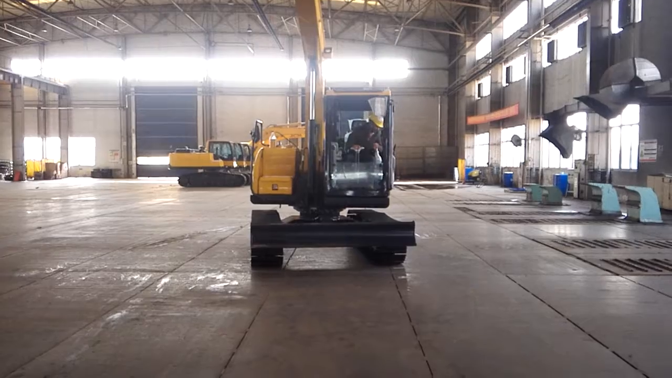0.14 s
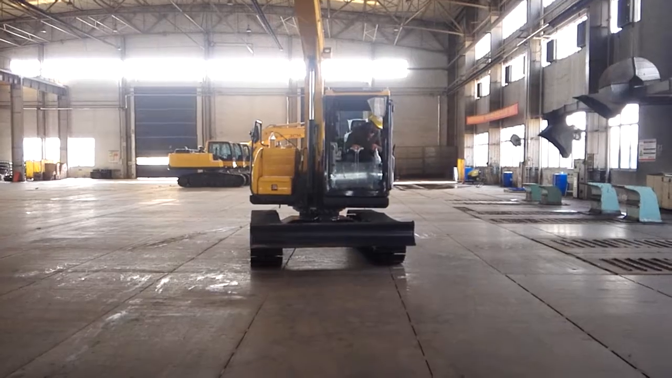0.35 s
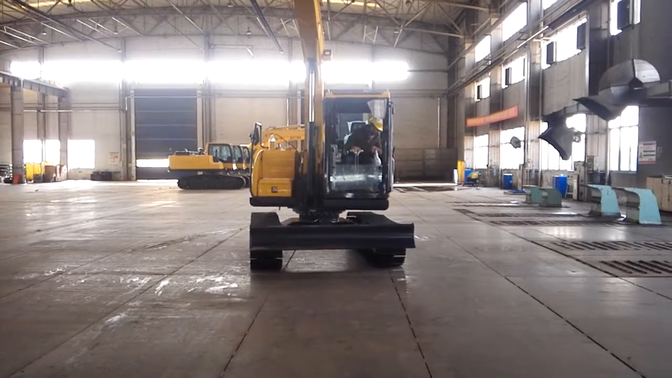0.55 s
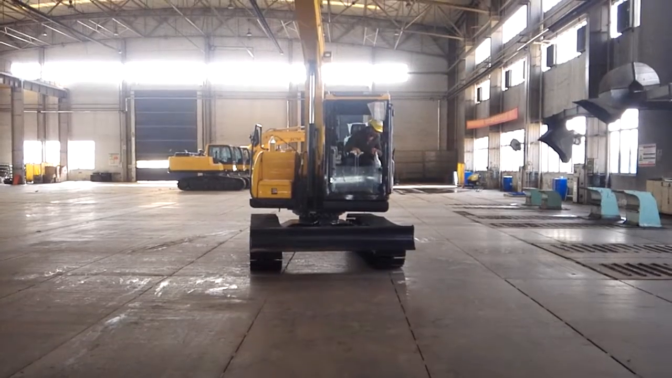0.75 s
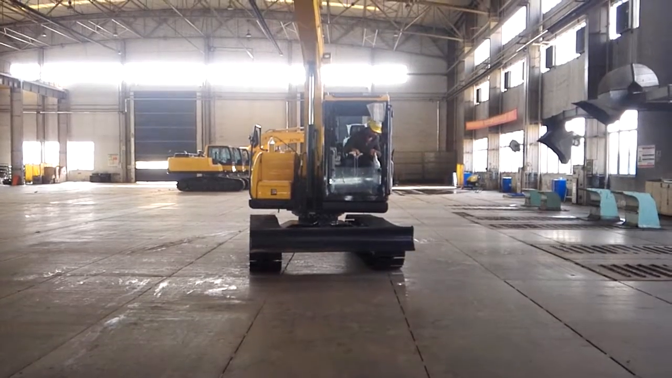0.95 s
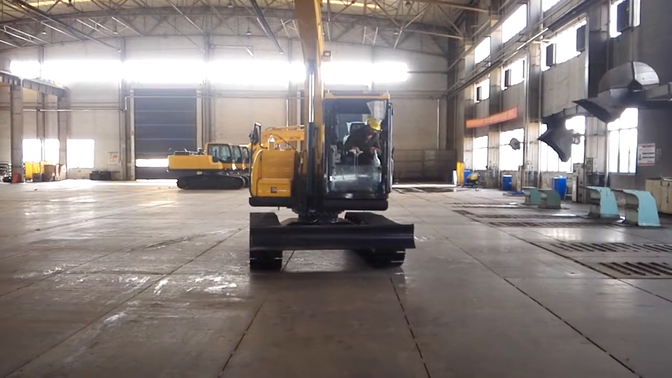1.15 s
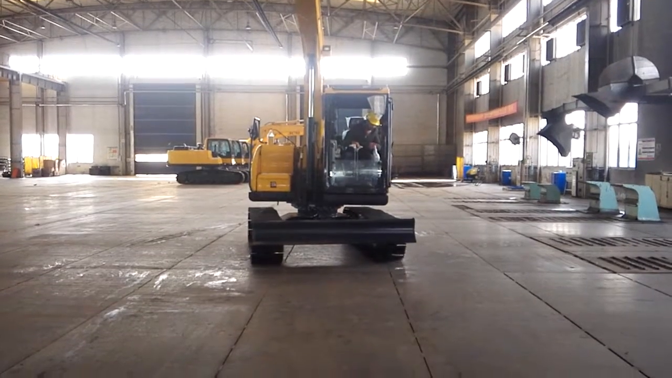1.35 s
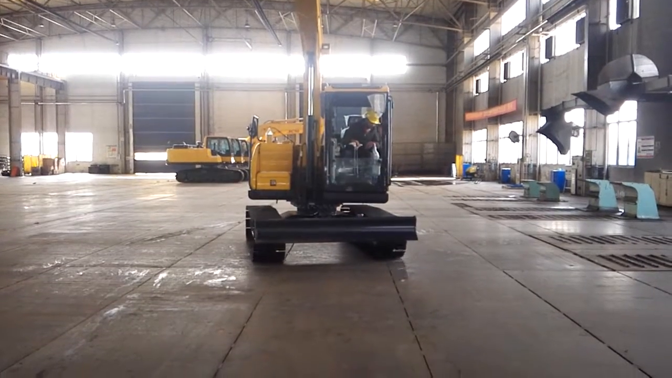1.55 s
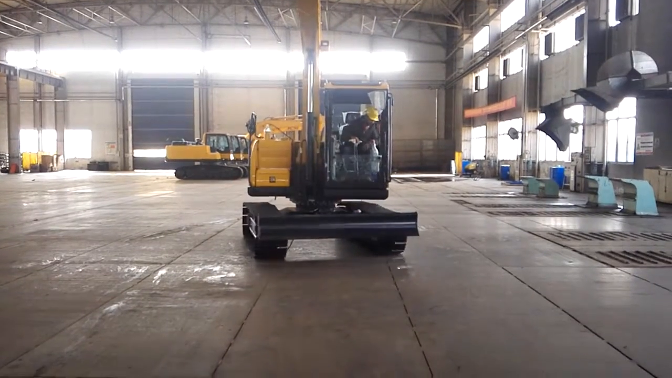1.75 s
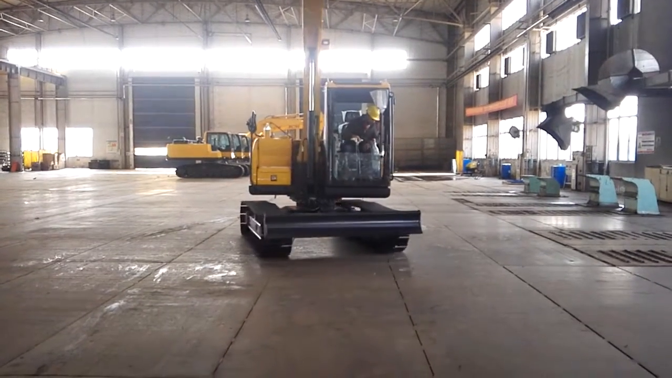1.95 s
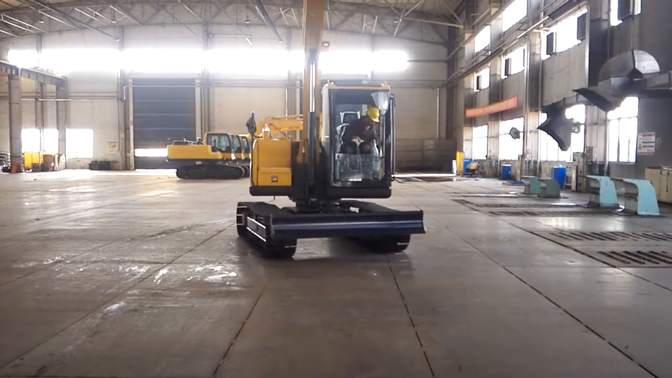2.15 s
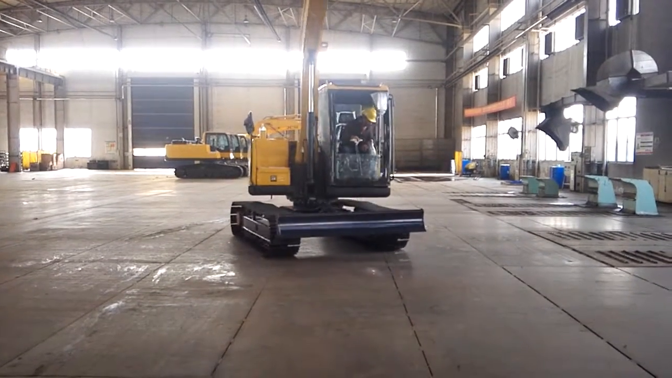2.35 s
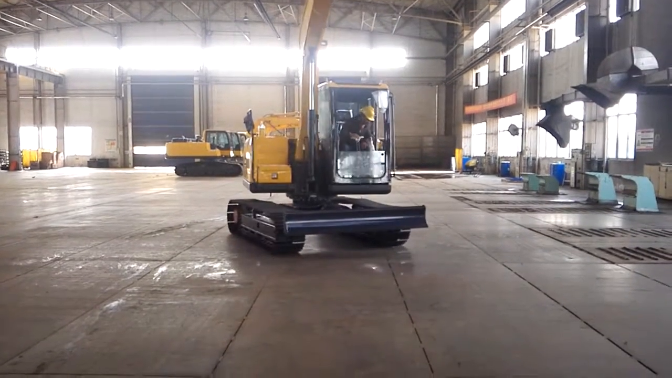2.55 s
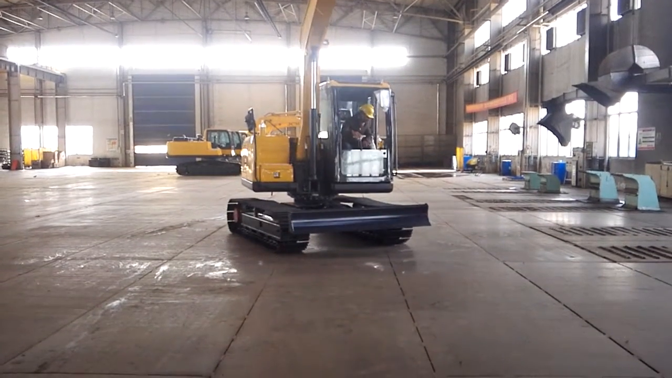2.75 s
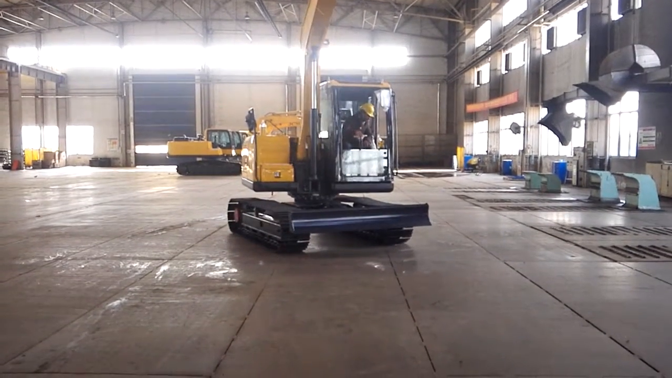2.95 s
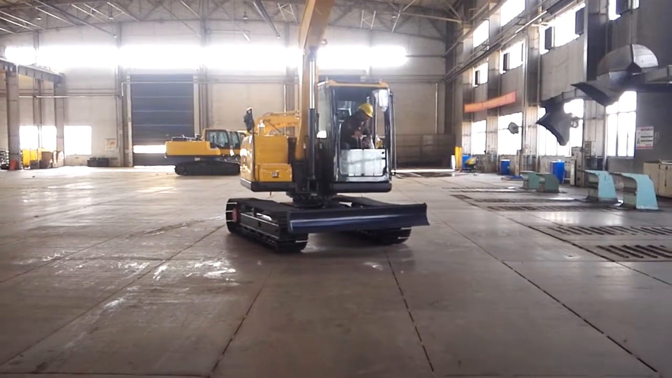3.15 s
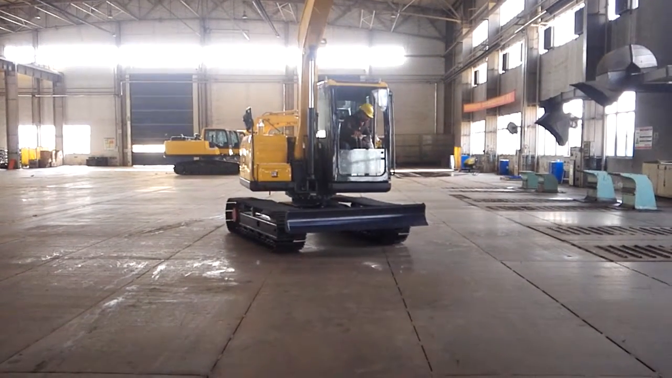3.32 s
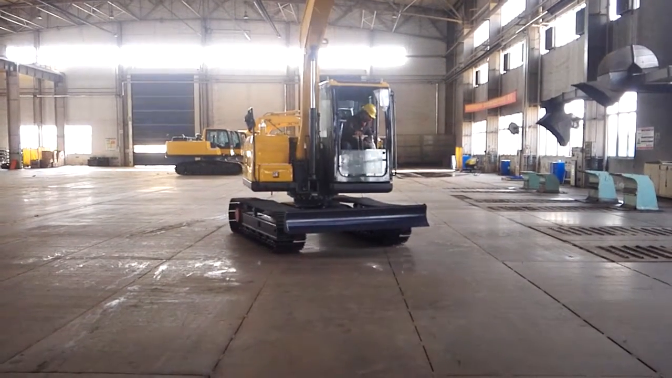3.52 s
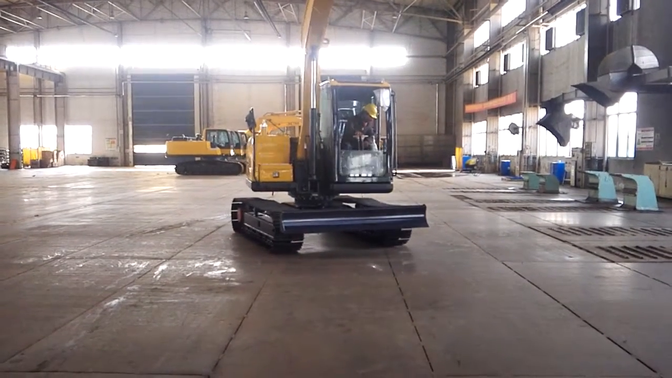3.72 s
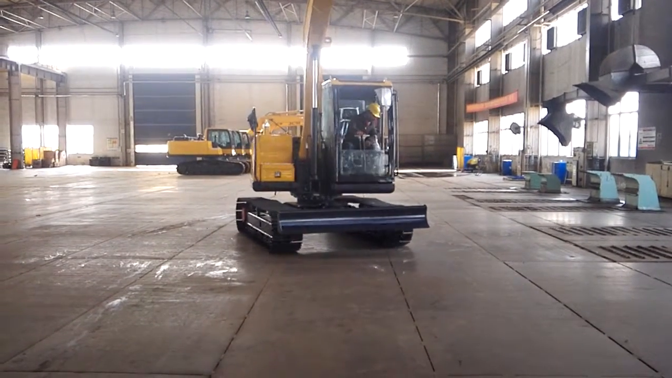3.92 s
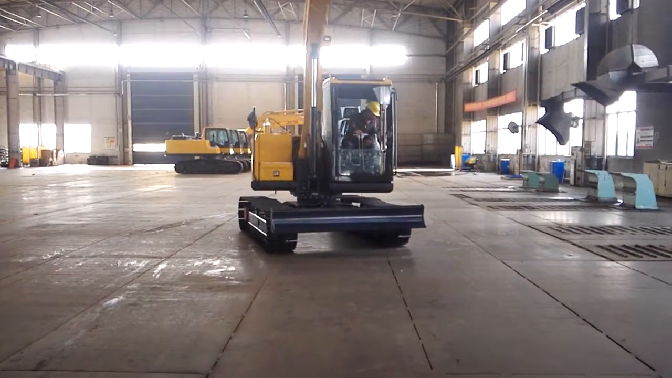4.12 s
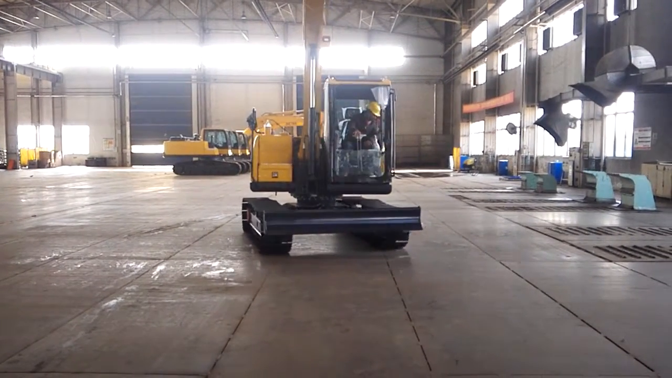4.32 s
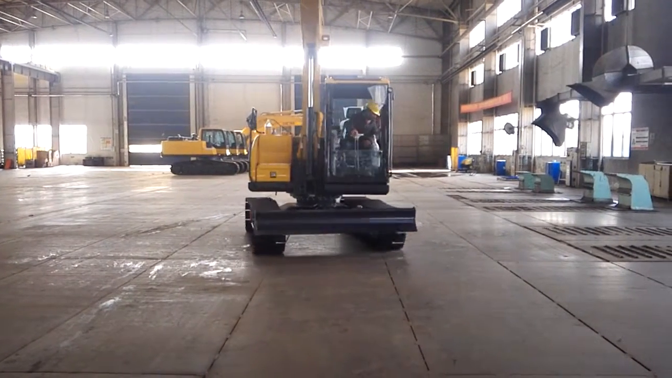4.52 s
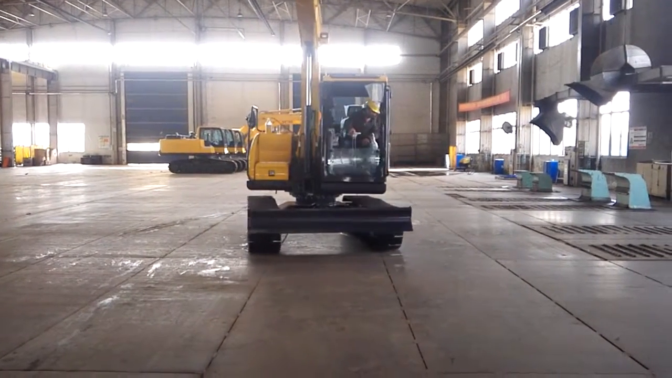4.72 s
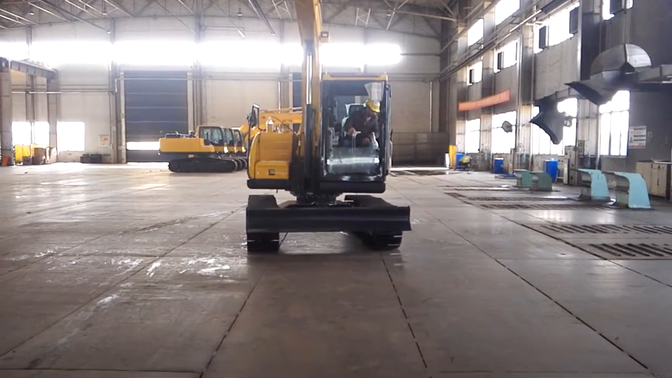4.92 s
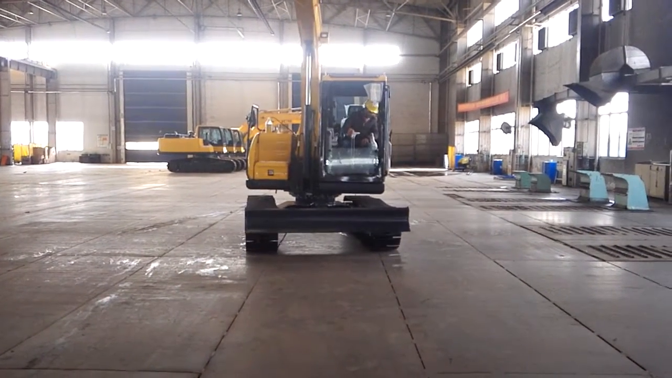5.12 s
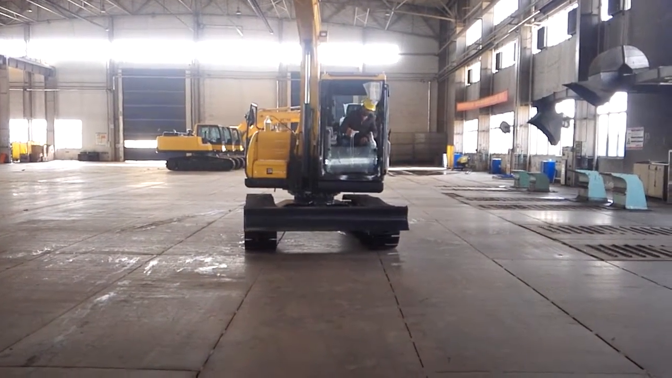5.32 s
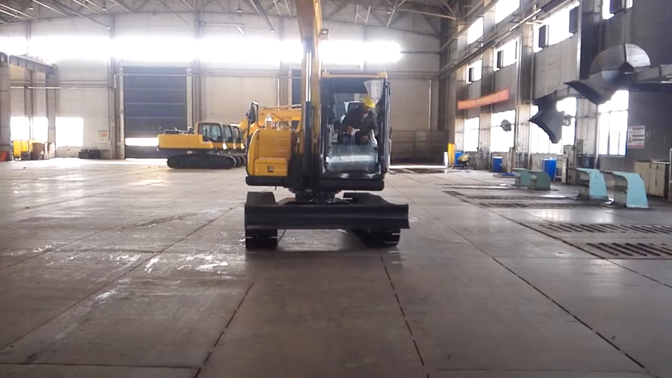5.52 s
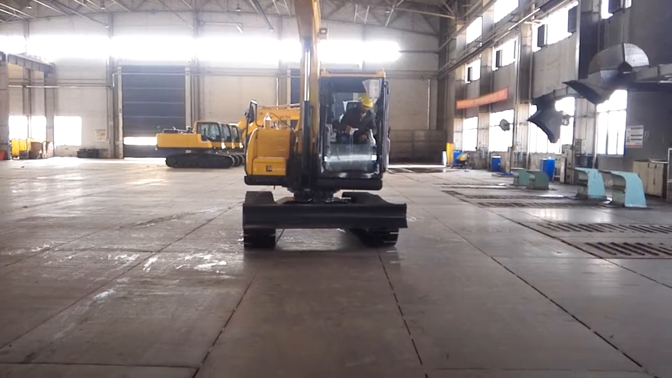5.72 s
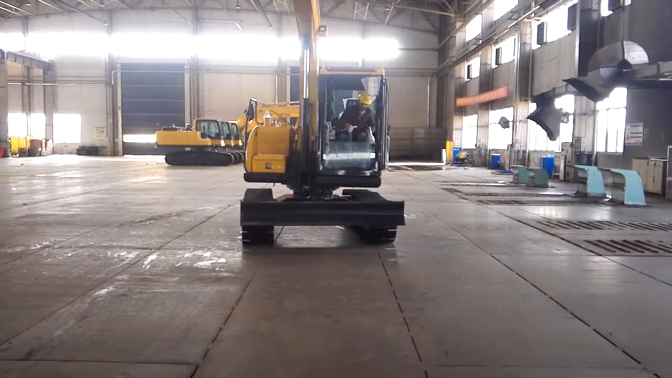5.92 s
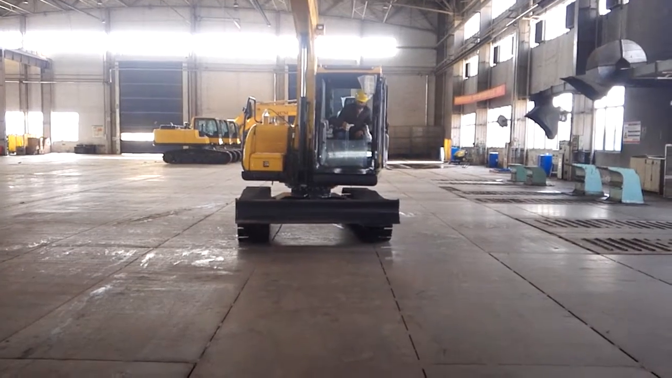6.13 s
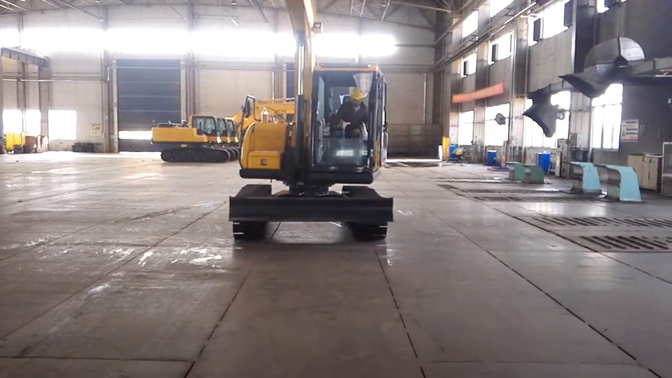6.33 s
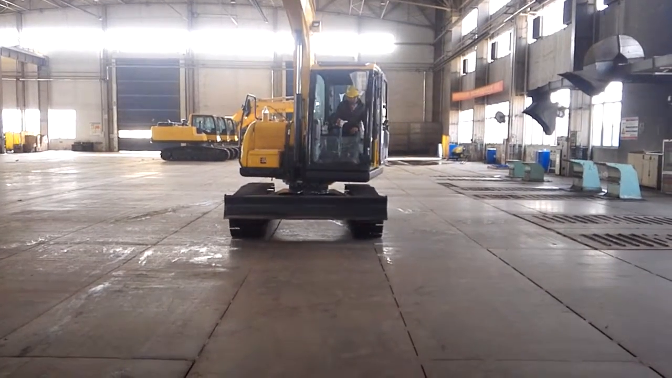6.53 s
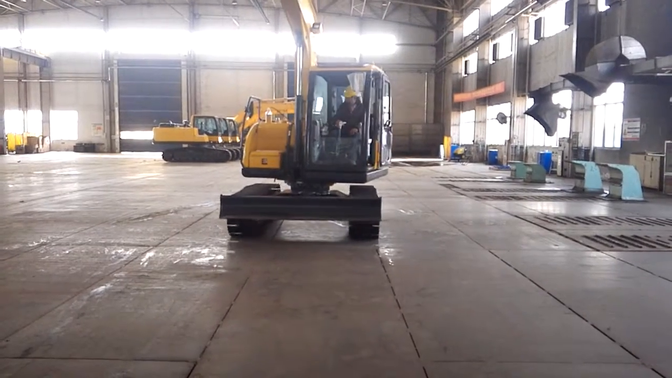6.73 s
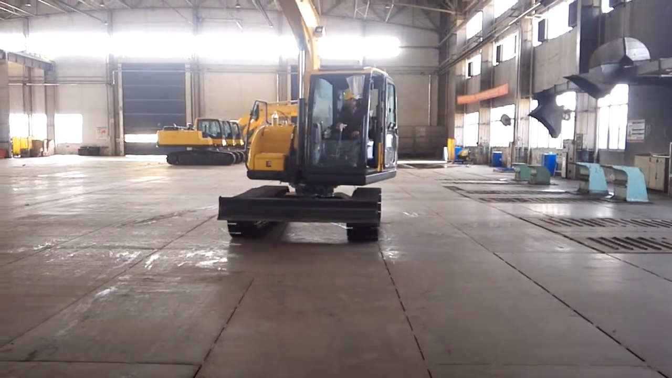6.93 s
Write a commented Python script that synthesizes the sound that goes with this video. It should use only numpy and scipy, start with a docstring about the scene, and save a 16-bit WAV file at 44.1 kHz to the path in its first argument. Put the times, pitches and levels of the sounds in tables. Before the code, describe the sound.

In a large concrete-floored hall, a small tracked excavator drones low. After a faint creep, its tracks grind and clank through one turn, pause into ringing reverberation, then turn back with the loudest, sharpest slams and dull knocks. A short second push follows, then a long quiet stretch and faint rolling. Stereo microphones stand some distance away.

```python
"""A large hall with a concrete floor: a small diesel excavator turns on its steel tracks, heard in stereo.
The engine drones on firing tones with noise for exhaust boom and drive whirr; hydraulic oil hisses.
Rollers and links knock dully, and the shoes grind as coloured noise broken into small slips.
Shoes stick and slip with loud clanks, noise bursts delayed most in the lows, so that each sweeps downward.
The hall answers clanks and knocks with a late noise tail that rings on for seconds."""
import sys
import numpy as np
from scipy import signal
from scipy.fft import rfft, irfft, next_fast_len
from scipy.io import wavfile
from scipy.ndimage import uniform_filter1d, map_coordinates

SR = 44100
rng = np.random.default_rng(int(sys.argv[2]) if len(sys.argv) > 2 else 0)


def unload_wav(signal):
    """Save mono or channel-first audio to the path in sys.argv[1] as 16-bit WAV at rate SR, clipped to [-1, 1]."""
    wavfile.write(
        sys.argv[1],
        SR,
        np.round(np.clip(np.atleast_2d(signal).T, -1, 1) * 32767).astype(np.int16),
    )


N = 307287
FIRING_HZ = 38.05  # mean firing rate of the engine
TOP_HZ = 14100  # band limit of the microphones

# the tracks creep twice, turn, turn back in two pushes, roll on; layer levels before each layer's trim:
# (start t/s, stop t/s, grinding level/dB, whirr level/dB, boom level/dB, oil level/dB, clank body level/dB)
TRACK_MOVES = [(-0.3, 0.05, -48, -49, -45, -49.5, -8), (0.79, 1.2, -46, -40, -65, -47.5, -4.5),
               (1.23, 2.447, -25, -27, -32.5, -48.5, -6), (3.359, 3.9, -24, -30, -31.5, -56, -11.5),
               (4.251, 4.438, -28.5, -34.5, -41, -64, -13.5), (5.84, 6.992, -43, -43, -48, -51, -14.5)]
GRINDING, WHIRRING, BOOMING, RUSHING, BODY = range(5)  # level columns after start and stop


def amp(db):
    """Decibels to gain."""
    return 10 ** (np.asarray(db) / 20)


def unit(x):
    """Scale to rms 1."""
    return x / np.sqrt(np.mean(x ** 2) + 1e-20)


def along(points, hz):
    """(f/Hz, value) points read on a log frequency axis."""
    f, v = np.transpose(points)
    return np.interp(np.log(hz + 1), np.log(f + 1), v)


def wobble(rate):
    """A smooth random curve, rate knots a second."""
    knots = rng.standard_normal(int(N * rate / SR) + 4)
    return map_coordinates(knots, [np.arange(N) * rate / SR])


def filtered(x, response):
    """x shaped by a response (real or complex) of frequency."""
    n = x.shape[-1]
    padded = next_fast_len(n + 8192)
    spectrum = rfft(x, padded) * response(np.fft.rfftfreq(padded, 1 / SR))
    return irfft(spectrum, padded)[..., :n]


def spread(pair):
    """Two unrelated signals to left and right: alike in the bass, mostly diffuse above."""
    # likeness of the two microphones: (f/Hz, left-right correlation)
    alike = [(60, 0.99), (140, 0.98), (280, 0.95), (500, 0.091), (1200, 0.41), (2500, 0), (12000, 0)]
    turn = lambda hz: np.arccos(np.clip(along(alike, hz), -1, 1)) / 2
    mid, side = filtered(pair, lambda hz: np.array([np.cos(turn(hz)), np.sin(turn(hz))]))
    return np.array([mid + side, mid - side])


def rush(colour_db):
    """Stereo noise of rms 1 with a colour given in dB over frequency."""
    noise = rng.standard_normal((2, N))
    return unit(spread(filtered(noise, lambda hz: amp(colour_db(hz)))))


def burst(length, response):
    """A pair of unrelated coloured noises, rms 1, length in samples."""
    return unit(filtered(rng.standard_normal((2, length)), response))


def ripple(hz, spacing_hz):
    """Plate resonances crowding the treble: a random rise and fall over frequency, one for each side."""
    knots = rng.standard_normal((2, 2048))
    treble = np.clip(hz / 3000, 0, 1)  # full strength from 3 kHz
    return treble * np.array([np.interp(hz / spacing_hz, np.arange(len(k)), k) for k in knots])


def patchy(x, depth_db):
    """Resonances come and go: random gain in patches of about 170 Hz by 60 ms."""
    z = signal.stft(x, nperseg=1024)[2]
    field = uniform_filter1d(rng.standard_normal(z.shape[1:]), size=4, axis=0)
    field = uniform_filter1d(field, size=5, axis=1)
    return signal.istft(z * amp(depth_db * unit(field)), nperseg=1024)[1][:, :N]


def driven(layer, attack, fall_db_per_s):
    """Gain of one layer over all moves: it builds up (attack in s), holds while the tracks run, then dies away."""
    t = np.arange(N) / SR
    power = np.zeros(N)
    for start, stop, *levels in TRACK_MOVES:
        rise = 1 - np.exp(-np.maximum(t - start, 0) / attack)
        fall_db = fall_db_per_s * np.maximum(t - stop, 0)
        power += (rise * amp(levels[layer] - fall_db)) ** 2
    return np.sqrt(power)


def idling(over_db):
    """Gain of a layer that sounds even when the tracks rest."""
    # level of the steady background: high at first, dropping at about 3.9 s, then partly recovering; # each
    # layer adds its trim: (t/s, level/dB)
    drone = [(0, -45.5), (1.05, -46.5), (2.1, -42.5), (3.4, -45), (3.9, -54), (4.25, -62.5), (5.6, -57.5),
             (6.97, -56)]
    seconds, level_db = np.transpose(drone)
    return amp(np.interp(np.arange(N) / SR, seconds, level_db) + over_db)


def engine(drift=0.0046, tone_db=-0.5):
    """Low firing tones; exhaust boom and drive whirr swell under load and throb faintly with the firings."""
    # engine tones, the one between the orders is the fan: (multiple of the firing rate, level/dB)
    tone_table = [(1, -6), (1.2, -2), (2.001, -1), (3, 0.5)]
    # colour of the exhaust boom: (f/Hz, level/dB per Hz)
    boom_colour = [(25, -38), (55, -14.5), (90, -8.5), (120, 1.5), (155, -1.5), (220, -3.5), (320, -5.5),
                   (500, -12.5), (1000, -48.5)]
    # colour of the drive whirr: (f/Hz, level/dB per Hz)
    whirr_colour = [(150, -17.5), (400, -4), (700, 1.5), (950, -1.5), (1250, -1.5), (1600, -7), (2100, -13),
                    (2600, -24.5), (4000, -32), (9000, -62.5)]
    boom_gain = np.hypot(idling(over_db=9.0), driven(BOOMING, attack=0.077, fall_db_per_s=20.5))
    whirr_gain = np.hypot(idling(over_db=7), driven(WHIRRING, attack=.15, fall_db_per_s=11))
    phase = 2 * np.pi * np.cumsum(FIRING_HZ * (1 + drift * wobble(5.9))) / SR
    tones = np.zeros(N)
    for multiple, db in tone_table:
        tone_gain = amp(db + 2.2 * wobble(3.9))
        tones += tone_gain * np.sin(multiple * phase + rng.uniform(0, 2 * np.pi))
    throb = 1 + .06 * np.cos(phase)
    boom = unit(rush(lambda hz: along(boom_colour, hz)) * throb)
    flutter = amp(1.1 * wobble(35))
    whirr = unit(rush(lambda hz: along(whirr_colour, hz)) * throb * flutter)
    return idling(over_db=tone_db) * tones + boom_gain * boom + whirr_gain * whirr


def hydraulics():
    """Oil hisses evenly through the valves while the tracks are driven."""
    # colour of the oil rush: (f/Hz, level/dB per Hz)
    oil = [(1000, -25.5), (3000, -3.5), (5000, -2.5), (8000, -6), (11000, -11.5), (13500, -21)]
    return driven(RUSHING, attack=.015, fall_db_per_s=22.5) * rush(lambda hz: along(oil, hz))


def knocks(t60=0.16, level_db=-7.5, attack=0.0063):
    """Dull blows swell through the undercarriage and die quickly (t60, attack in s)."""
    # rollers and links knocking as the tracks roll: (t/s, level/dB before level_db)
    blows = [(0.797, -18), (0.86, -25), (1.444, -16.5), (1.678, -11.5), (2.084, -11.5), (3.592, -5.5),
             (3.846, -11.5), (4.013, -2.5), (4.314, -7), (6.035, -26), (6.297, -26.5), (6.373, -22),
             (6.477, -25), (6.534, -23.5), (6.69, -25.5), (6.846, -23.5), (6.917, -21)]
    # colour of a knock: (f/Hz, level/dB per Hz)
    dull = [(100, -27), (250, -8.5), (420, -15), (620, 1), (780, 2.5), (950, -2), (1250, -1), (1700, -17.5),
            (3000, -26), (8000, -51)]
    out = np.zeros((2, N + SR))
    t = np.arange(SR // 3) / SR
    swell = 1 - np.exp(-t / attack)
    shape = swell * amp(-60 * t / t60)
    for s, db in blows:
        ring = burst(len(t), lambda hz: amp(along(dull, hz)))
        start = round((s - .002) * SR)
        out[:, start:start + len(t)] += amp(db + level_db) * ring * shape
    return spread(out[:, :N])


def shoe_db(hz):
    """The lift or dip that the track's resonances give, in dB."""
    # track resonances: (f/Hz, width/Hz, level/dB)
    modes = [(2215, 33, 3.5), (2650, 30, -3.5), (3500, 38, 5), (3650, 77, 2), (4140, 27, 2.5),
             (4338, 23, -1), (4440, 26, 2.5), (4990, 33, 3), (5130, 26, 3.5), (5420, 40, -5.5),
             (6050, 50, 6.5), (6550, 39.2, 4.5), (6640, 51, 6.5)]
    return sum(db / (1 + (2 * (hz - centre) / width) ** 2) for centre, width, db in modes)


def grinding(level_db=-1, judder_db=1):
    """Shoes drag over grit in small uneven slips, changing colour as the contact moves."""
    # colour of the grit under the shoes: (f/Hz, level/dB per Hz)
    grit_colour = [(600, -27.5), (1500, 3.5), (2200, 1.5), (3000, -1), (4800, -1.5), (7000, -9.5),
                   (9500, -17.5), (11500, -30), (13000, -32), (15000, -44.5)]
    gain = np.hypot(idling(over_db=4.5), driven(GRINDING, attack=0.042, fall_db_per_s=61))
    slips = amp(judder_db * wobble(30))
    grit = rush(lambda hz: along(grit_colour, hz) + 0.75 * shoe_db(hz))
    scrape = patchy(grit, depth_db=2.6)
    return amp(level_db) * gain * unit(slips * scrape)


def body_of(s, peak_db, thinning=0.2, typical_db=-10):
    """The move sets how much body its clanks have (dB); the harder the clank, the thinner it is."""
    starts = [move[0] for move in TRACK_MOVES]
    _, _, *levels = TRACK_MOVES[max(np.searchsorted(starts, s) - 1, 0)]
    return levels[BODY] - thinning * (peak_db - typical_db)


def own_colour(hz, fine_db=2.0, broad_db=1.7):
    """Every clank favours its own resonances: narrow ones for each side, broad ones common to both."""
    return amp(fine_db * ripple(hz, 70) + broad_db * ripple(hz, 300)[0])


def bending(hz, sweep=.016):
    """Bending waves travel as the root of frequency, so the lows arrive late: a phase-only response."""
    # delay = sweep * (sqrt(1000 / hz) - sqrt(1000 / TOP_HZ)) in s, none at the band limit
    cycles = sweep * (2 * np.sqrt(1000 * hz) - hz * np.sqrt(1000 / TOP_HZ))
    return np.exp(-2j * np.pi * cycles)


def clanks(attack=0.00078, softening=0.83, t60=0.19, grain_db=2, level_db=-9.5, body_db=9, body_hz=1800,
           snap_db=-8, snap_grows=0.357, snap_t60=0.095):
    """Each slip is a bright snap and a short judder of steel on concrete, ringing through the track."""
    # track shoes slipping and slamming: (t/s, level/dB before level_db, length of the judder/s)
    slams = [(1.196, -17, 0.056), (1.26, -13, 0.034), (1.3144, -16, 0.019), (1.4356, -9, 0.025),
             (1.5536, -16.5, 0.011), (1.6168, -7.5, 0.011), (1.6362, -5, 0.053), (1.7926, -9.5, 0.0075),
             (1.944, -13.5, 0.013), (2.0638, -11, 0.021), (2.2165, -14.5, 0.02), (2.3476, 0.5, 0.02),
             (3.337, -21, 0.027), (3.3899, 1.5, 0.015), (3.471, -1, 0.018), (3.5797, 6, 0.026),
             (3.6534, -7, 0.043), (3.8028, -3, 0.022), (3.836, -2, 0.034), (3.9526, -3, 0.025),
             (3.9943, 5, 0.014), (4.1028, -14.5, 0.038), (4.2611, -8, 0.014), (4.3002, -3.5, 0.034),
             (4.405, -11.5, 0.025), (4.4595, -11, 0.014), (4.6581, -22.5, 0.018), (5.8433, -22.5, 0.035),
             (6.2043, -31.5, 0.028), (6.2744, -28.5, 0.036), (6.587, -29, 0.037)]
    # colour of the ringing steel: (f/Hz, level/dB per Hz)
    steel_colour = [(50, -43.5), (130, -10.5), (260, -4), (420, -9.5), (740, 2.5), (930, -3), (1150, 4),
                    (1600, 1), (2200, 1.5), (2750, -0.5), (4900, 2), (9500, -9), (11800, -26),
                    (13500, -25.5)]
    # colour of the first snap of a slip: (f/Hz, level/dB per Hz)
    snap_colour = [(300, -12), (3000, -1), (8000, 0), (12000, -8.5), (15000, -18.5)]
    out = np.zeros((2, N + SR))
    t = np.arange(SR // 3) / SR
    for s, db, length in slams:
        lift_db = body_of(s, db) + body_db
        body = lambda hz: lift_db / (1 + (hz / body_hz) ** 4)  # below body_hz
        colour = lambda hz: amp(along(steel_colour, hz) + shoe_db(hz) + body(hz))
        ring = burst(len(t), lambda hz: colour(hz) * own_colour(hz))
        grains = amp(grain_db * wobble(888)[:len(t)])
        rise = attack * amp(-db / 2) ** softening  # gentle slips swell, hard ones snap
        shape = (1 - np.exp(-t / rise)) * amp(-60 * np.maximum(t - length, 0) / t60)
        crack = burst(len(t), lambda hz: amp(along(snap_colour, hz)))
        snap = crack * amp(snap_db + snap_grows * db - 60 * t / snap_t60)
        start = round((s - .003) * SR)
        clank = filtered(grains * (ring * shape + snap), bending)
        out[:, start:start + len(t)] += amp(db + level_db) * clank
    return spread(out[:, :N])


def hall(x, gap=0.0277, build=0.01):
    """The far walls answer after a gap (s) and build up (s); the top of the treble dies well before the mids."""
    # reverberation of the hall: (f/Hz, t60/s)
    decay = [(150, 2.5), (600, 1.3), (1400, 4.5), (2400, 2.49), (3700, 1.56), (6000, 1.22), (10000, 0.97),
             (15000, 1.05)]
    hz, t, z = signal.stft(rng.standard_normal((2, 3 * SR)), SR, nperseg=256)
    swell = 1 - np.exp(-np.maximum(t - gap, 0) / build)
    fade = amp(-60 * t / along(decay, hz)[:, None])
    tail = signal.istft(z * swell * fade, SR, nperseg=256)[1]
    return signal.fftconvolve(x, tail / np.linalg.norm(tail[0]), axes=1)[:, :N]


def scene():
    """Tracks and engine in the hall; the track frame colours the clanks, their echo and the grinding."""
    steel = clanks()
    tracks = steel + amp(-11.0) * hall(steel) + grinding()
    tracks = filtered(tracks, lambda hz: amp(1.4 * ripple(hz, 35)))
    rolling = knocks()
    return tracks + rolling + amp(-15.5) * hall(rolling) + engine() + hydraulics()


def record(dry, top=1.08):
    """Each microphone has its colour; loud peaks round off near full scale; the band ends at TOP_HZ."""
    # the two microphones differ in colour: (f/Hz, left over right level/dB)
    tilt = [(500, 0), (2000, 0), (4000, 1.4), (8000, -5), (12000, 2.5)]
    heard = filtered(dry, lambda hz: amp(np.outer([1, -1], along(tilt, hz)) / 2))
    rounded = heard / (1 + np.abs(heard / top) ** 6) ** (1 / 6)
    return filtered(rounded, lambda hz: hz < TOP_HZ)


dry = scene()
out = record(dry)
unload_wav(out)
```